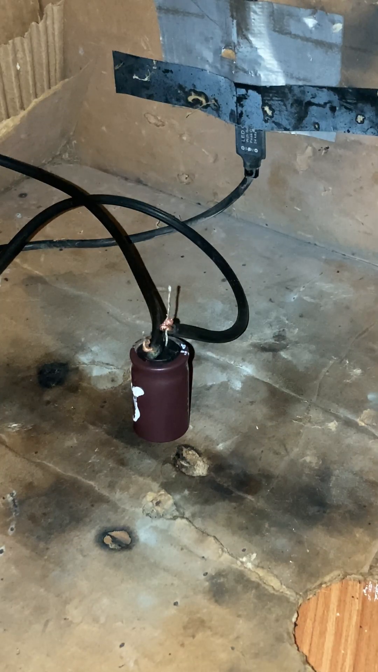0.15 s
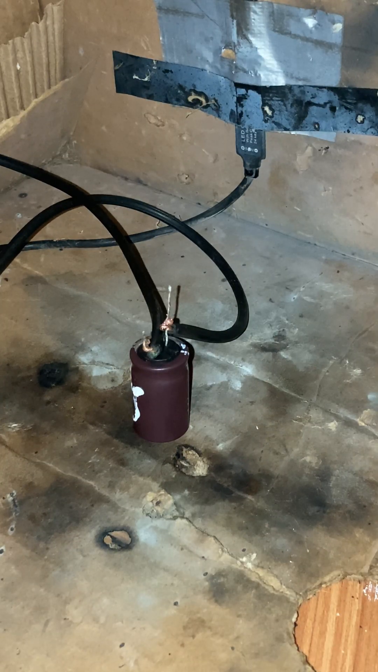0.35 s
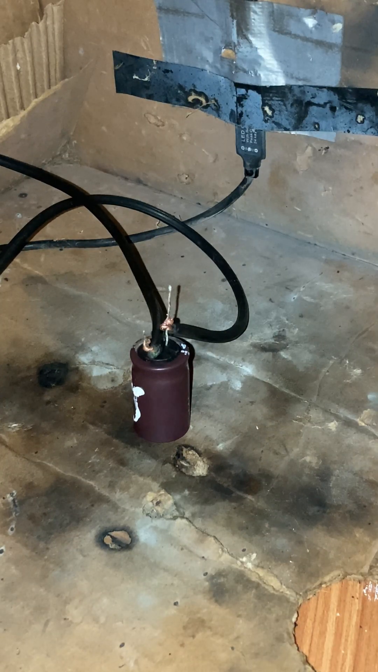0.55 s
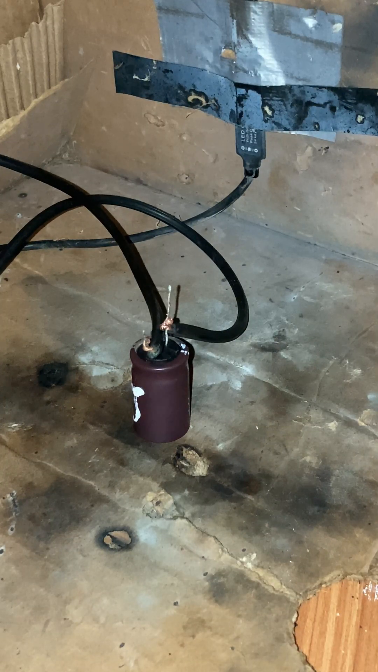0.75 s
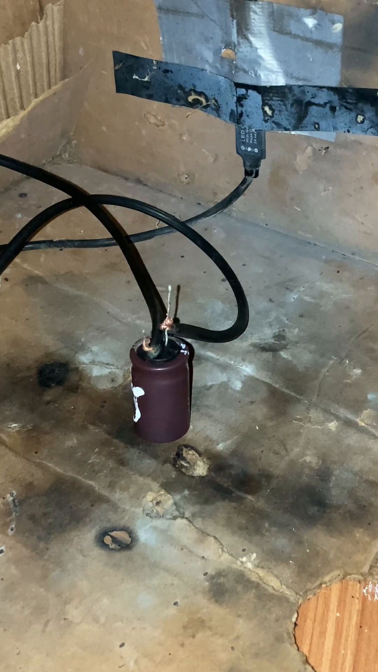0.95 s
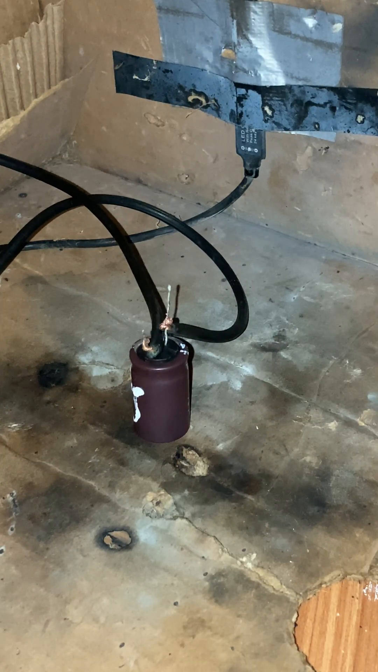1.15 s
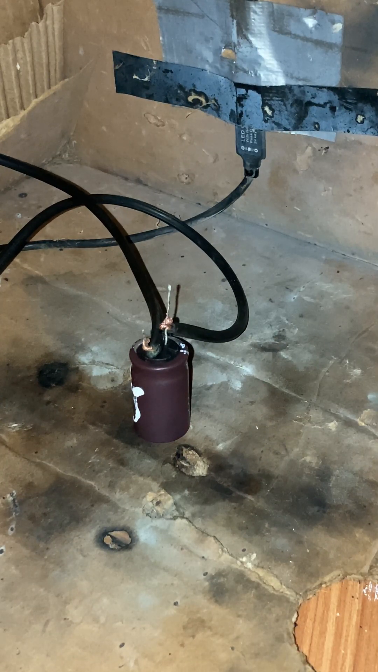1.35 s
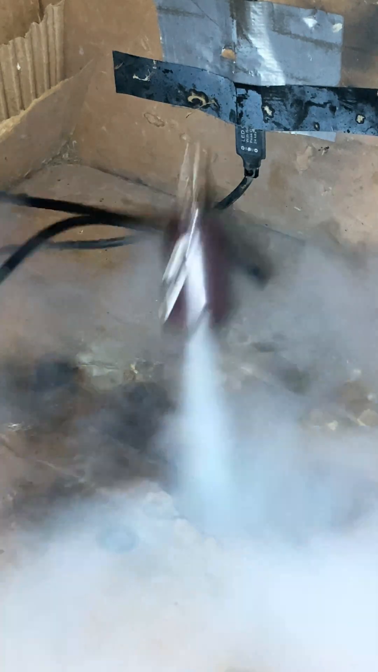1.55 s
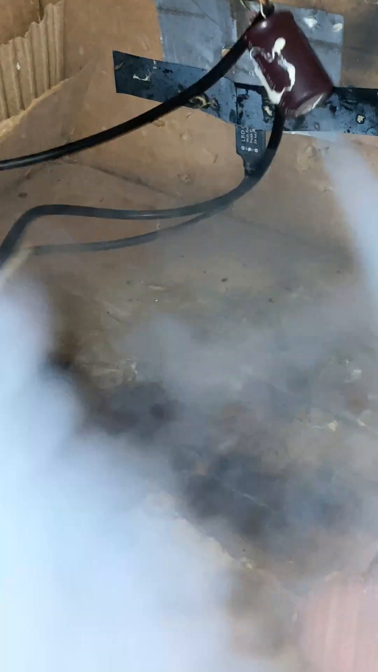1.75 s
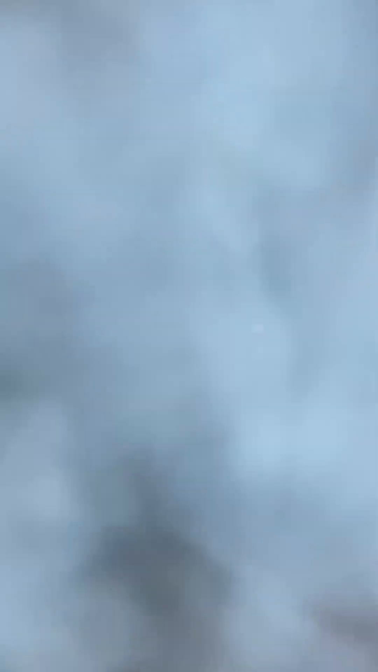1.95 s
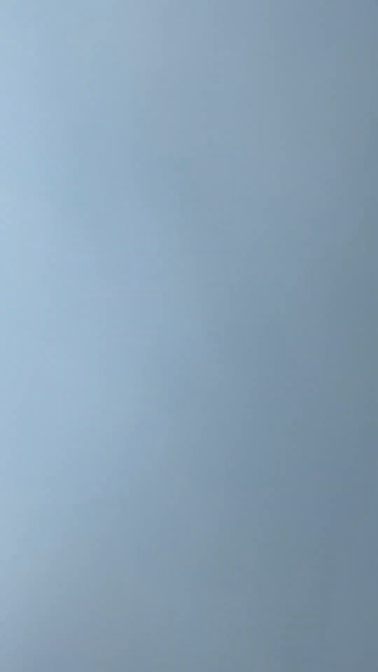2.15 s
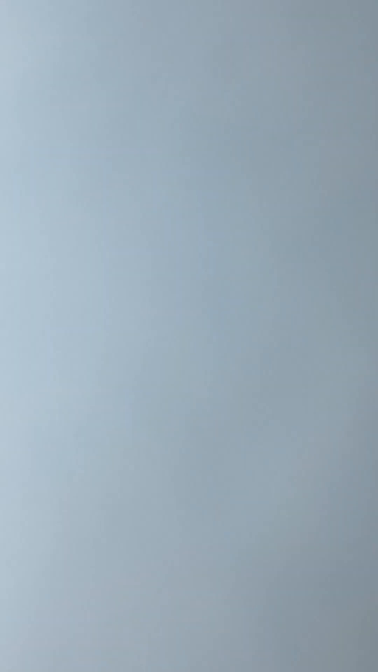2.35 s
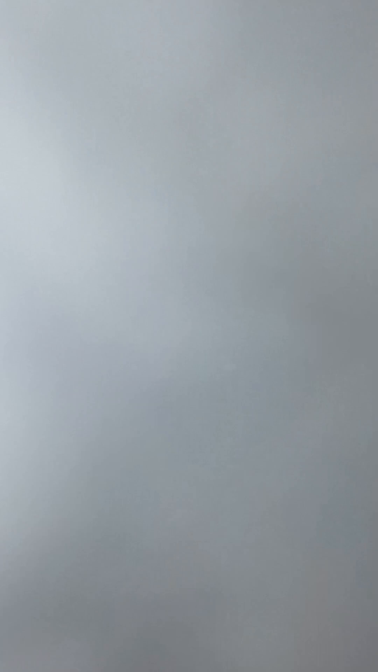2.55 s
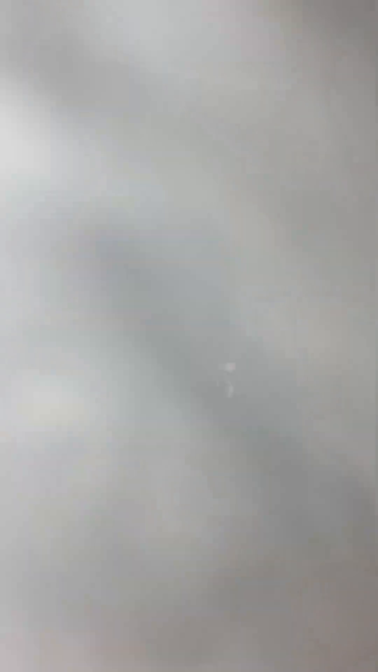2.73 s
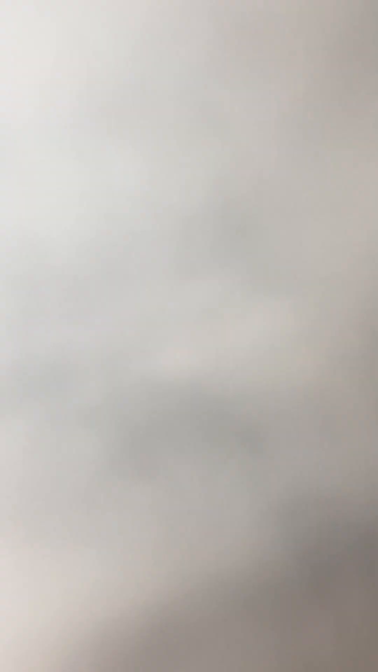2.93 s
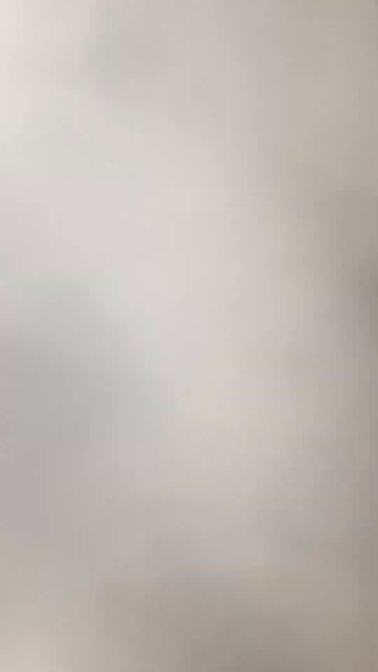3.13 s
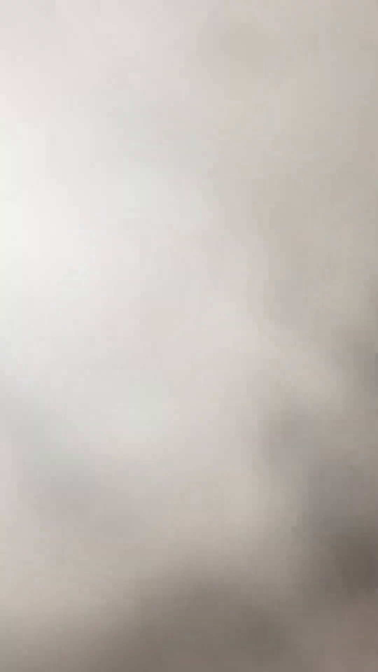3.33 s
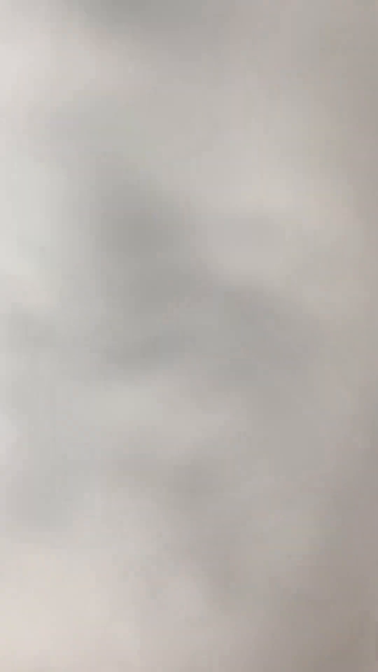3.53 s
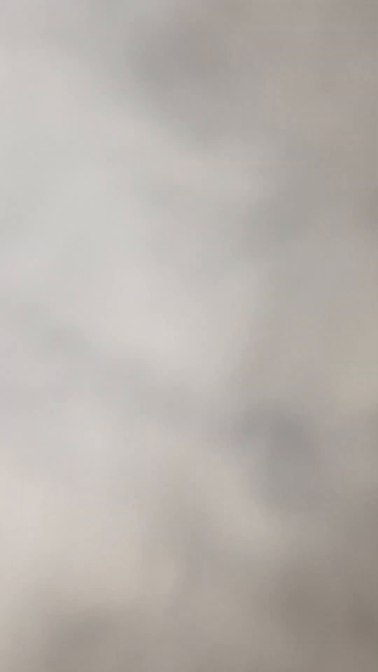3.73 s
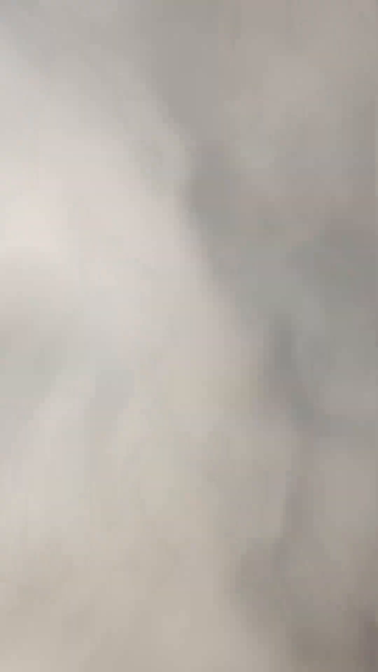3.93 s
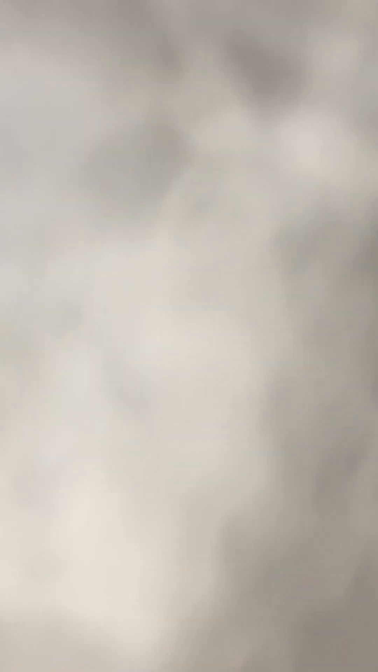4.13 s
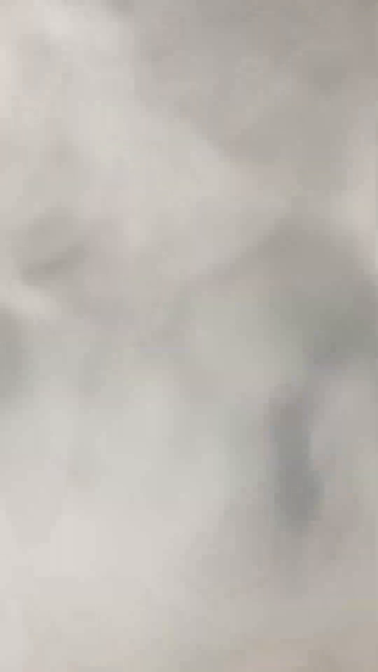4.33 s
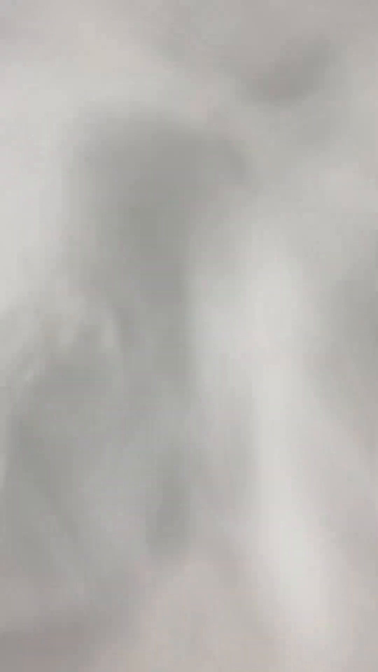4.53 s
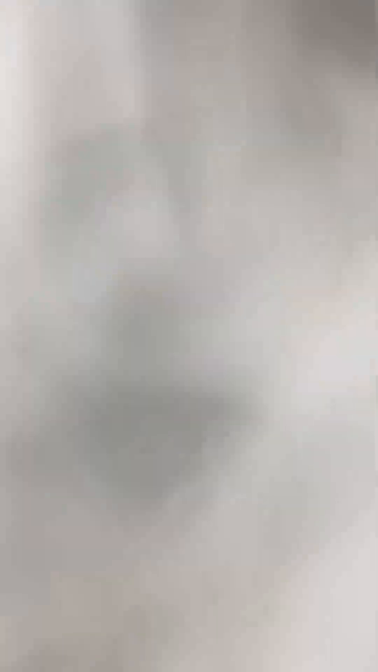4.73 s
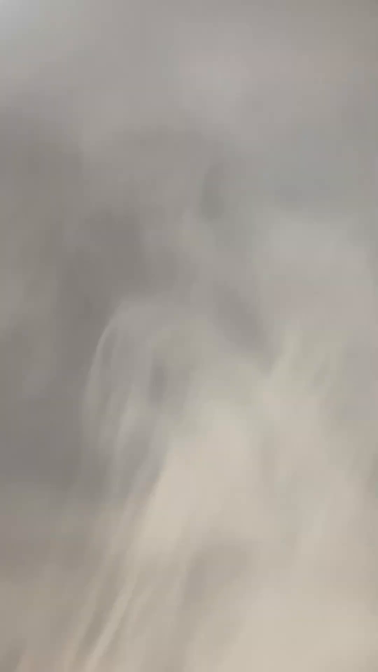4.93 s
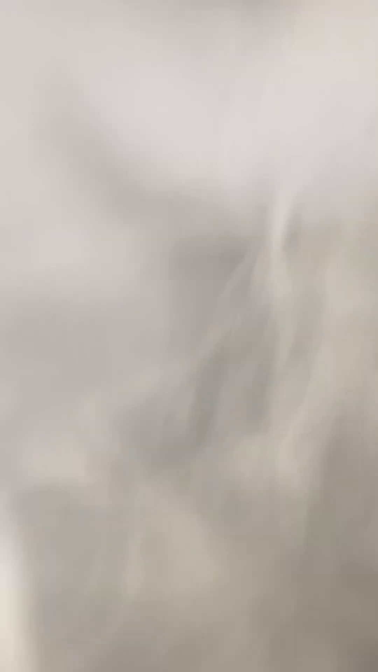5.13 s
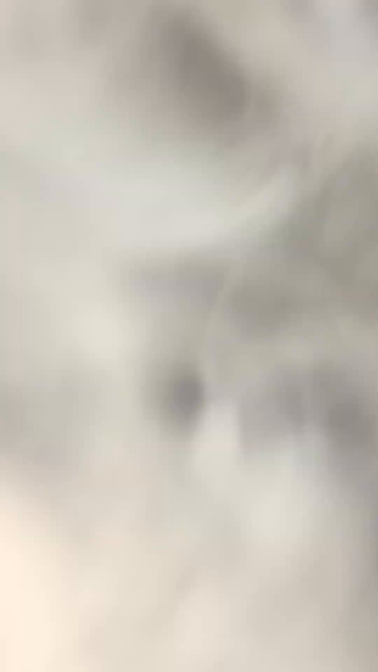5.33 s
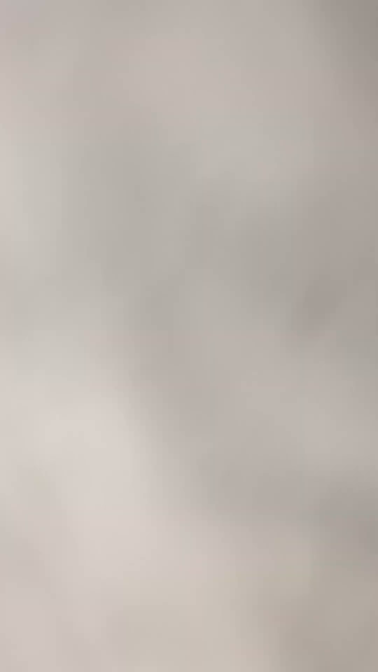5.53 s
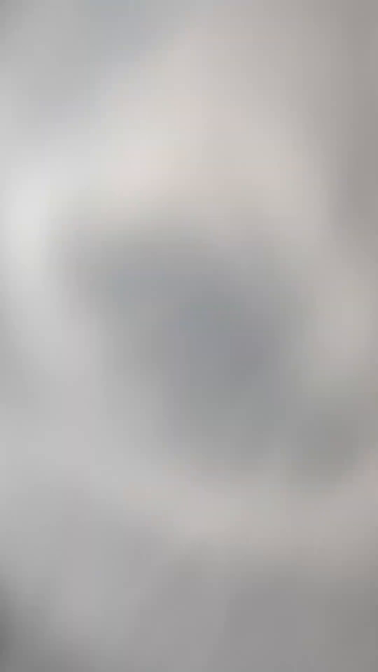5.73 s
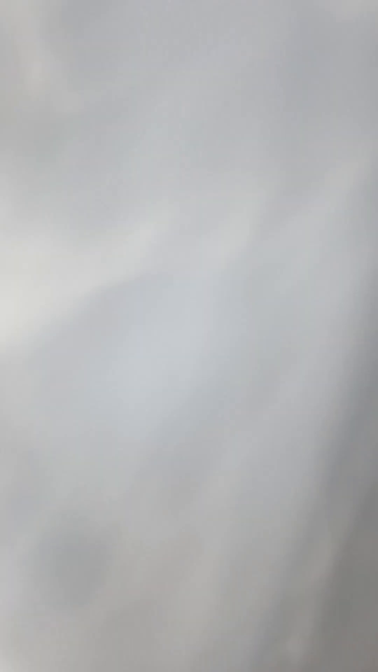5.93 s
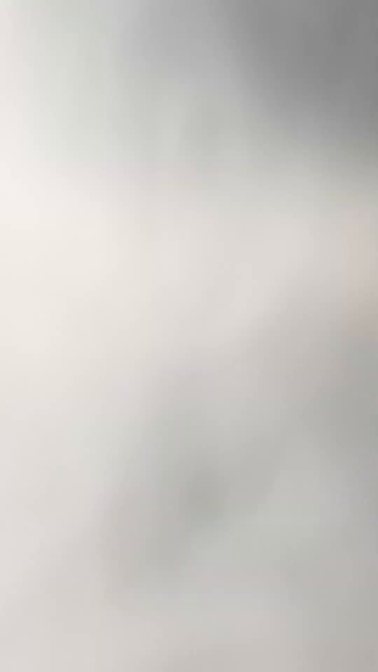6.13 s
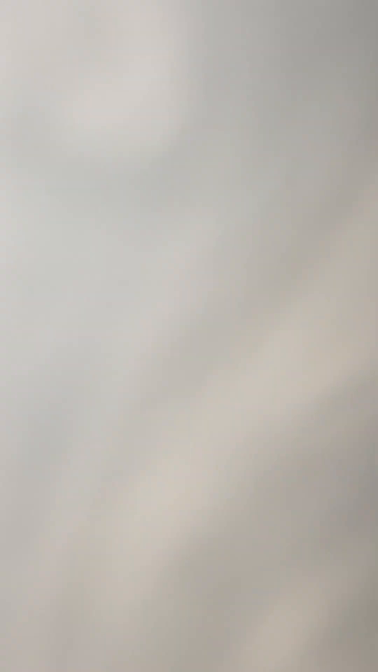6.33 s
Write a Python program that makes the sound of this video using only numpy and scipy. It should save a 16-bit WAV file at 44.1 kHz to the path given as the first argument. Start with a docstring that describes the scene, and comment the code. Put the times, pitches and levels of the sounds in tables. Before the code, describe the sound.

A capacitor bursts with a sharp crack, knocks against a wooden box and vents smoke in a spitting hiss over a droning fan.

```python
"""A workshop, a phone microphone listening from above. A fan drones throughout. A capacitor on mains
leaks a thin hiss that dies away. At 1.5 s its vent bursts with a crack, a thump and a brief high ring of
the can; the drone sinks. The can is flung against the wall of a wooden box: three knocks, the hardest with
a clack at 1.94 s. It blows smoke in a spitting hiss, strongest near 3 s, until it is empty, while the
drone slowly comes back."""
import sys
import numpy as np
from scipy import signal
from scipy.fft import rfft, irfft
from scipy.io import wavfile
from scipy.ndimage import uniform_filter1d, map_coordinates

SR = 44100
rng = np.random.default_rng(int(sys.argv[2]) if len(sys.argv) > 2 else 0)


def generate_wav(sig):
    """Save sig (samples, or channels by samples) to the path in sys.argv[1] as 16-bit PCM at SR."""
    pcm = np.round(np.clip(np.atleast_2d(sig).T, -1, 1) * 32767).astype(np.int16)
    wavfile.write(sys.argv[1], SR, pcm)


N = 285768
TIME_S, BIN_HZ = np.arange(N) / SR, np.fft.rfftfreq(N, 1 / SR)
BURST_S, FLYING_S, LANDS_S, SETTLED_S = 1.494, 1.53, 1.94, 2.19


def undb(db):
    return 10 ** (np.asarray(db) / 20)


def over_time(table):
    """Columns of a table over time, one value a sample."""
    time_s, *columns = np.transpose(table)
    return [np.interp(TIME_S, time_s, column) for column in columns]


def over_hz(table):
    """Columns of a table over log frequency, one value a bin."""
    hz, *columns = np.transpose(table)
    return [np.interp(np.log(np.maximum(BIN_HZ, 1)), np.log(hz), column) for column in columns]


def wander(per_s):
    """Random steps, smoothed twice; spread near 1."""
    hold = int(SR / per_s)
    steps = np.repeat(rng.standard_normal(N // hold + 1), hold)
    return 1.42 * uniform_filter1d(uniform_filter1d(steps, hold), hold)[:N]


def air_noise(spectrum, flicker_db, per_s):
    """Two unrelated noises of joint rms 1 in this colour; each half octave flickers alone."""
    colour_db, = over_hz(spectrum)
    bins = rfft(rng.standard_normal((2, N))) * undb(colour_db)
    octave = np.log2(BIN_HZ + 1)
    out = 0
    for centre in np.arange(np.log2(spectrum[0][0]), np.log2(spectrum[-1][0]) + .5, .5):
        band = np.cos(np.pi * np.clip(octave - centre, -.5, .5)) ** 2
        out = out + irfft(bins * band, N) * undb(flicker_db * wander(per_s))
    return out / np.sqrt(np.mean(out ** 2))


def swell(start_s, rise_s, t60_s):
    """Time since the start, and an envelope with top 1 that rises softly and dies away."""
    age = np.maximum(TIME_S - start_s, 0)
    envelope = (1 - np.exp(-age / rise_s)) ** 2 * 1000. ** (-age / t60_s)
    return age, envelope / envelope.max()


# Resonances of the fan's casing: pitch_hz, width_hz, level_db (against the fan's air)
CASING_MODES = [(523.6, 47, -11), (741.6, 4.6, -18), (923, 13, -22.5), (1285, 8.3, -26), (1529, 47, -26)]
def fan_casing():
    """Air rings in the steady resonances of the casing."""
    out = 0
    for hz, width_hz, db in CASING_MODES:
        ring = signal.lfilter(*signal.iirpeak(hz, hz / width_hz, fs=SR), rng.standard_normal((2, N)))
        out = out + undb(db) * ring / ring.std()
    return out


# Colour of the fan's air: frequency_hz, density_db
FAN_SPECTRUM = [(12, -68), (31, -50), (38, -13.5), (45, -19), (125, -5), (171, -9.5), (300, -25),
                (430, -20), (615, -22.5), (735, -19.5), (999, -33.5), (1500, -33.5), (1800, -46.5),
                (2440, -40.5), (4750, -51.5), (7530, -69), (9000, -87), (11700, -99), (19800, -120)]
# Blade tone: time_s, pitch_hz, level_db (against the fan's air)
BLADE_TONE = [(0, 134.2, -4), (.6, 137.3, 1), (1.5, 138.1, 1), (1.53, 138.4, -37), (2.1, 139, -10),
              (2.2, 136, 4), (2.7, 134, -2), (3.0, 137.4, -13), (3.5, 143, 1), (4.2, 143.7, 1),
              (4.4, 142.5, -6), (4.62, 142.7, 0.5), (5.5, 145.3, 3), (5.8, 145.1, 3), (5.95, 145.3, -4.5),
              (6.48, 146, 1)]
# The whole drone, sinking at the burst: time_s, level_db
FAN_LEVEL = [(0, -28), (1.2, -28), (1.5, -27.5), (1.53, -38), (1.85, -34.5), (2.16, -34), (3.0, -34.5),
             (4.4, -36), (5.2, -32.5), (6.48, -31)]
def fan():
    """The workshop's room tone: rumbling air, the casing, a wavering blade tone that creeps upward."""
    blade_hz, blade_db = over_time(BLADE_TONE)
    waver = 1 + .2 * (wander(per_s=6) + 1j * wander(per_s=6))
    blade = (waver * np.exp(2j * np.pi * np.cumsum(blade_hz) / SR)).real
    level_db, = over_time(FAN_LEVEL)
    buffet_db = .4 * wander(per_s=40)
    rumble = air_noise(FAN_SPECTRUM, flicker_db=.5, per_s=30)
    return undb(level_db + buffet_db) * (rumble + undb(blade_db) * blade + fan_casing())


# Modes of the wooden box: pitch_hz, level_db, t60_s, delay_s
BOX_MODES = [(150, -12, .05, .003), (236, -1, .045, .0031), (445, -9, .025, .0044), (650, 0, .03, 0),
             (950, -1, .025, 0), (1250, -3, .015, 0), (1550, -2, .015, 0), (1800, 0, .015, 0),
             (2400, -10, .01, 0)]
# The can striking the box: start_s, level_db, tick_db (added to the undelayed modes)
CAN_STRIKES = [(1.674, -29, -20), (1.940, -11, -16), (2.013, -25, -22)]
def box_knocks():
    """The can ticks on contact, then the panel answers with its low modes."""
    out = 0
    for start_s, strike_db, tick_db in CAN_STRIKES:
        for hz, mode_db, t60_s, delay_s in BOX_MODES:
            age, envelope = swell(start_s + delay_s, rise_s=.00084, t60_s=t60_s)
            db = strike_db + mode_db + (tick_db if delay_s == 0 else 0)
            out = out - undb(db) * envelope * np.sin(2 * np.pi * hz * age)
    return out


# Pressure wave of the burst: start_s, first_pitch_hz, last_pitch_hz, glide_s, rise_s
PRESSURE_WAVE = (1.49425, 760, 42, .0045, .0035)
def burst_thump():
    """The pressure wave in the box: its pitch drops fast, the lows come last."""
    start_s, first_hz, last_hz, glide_s, rise_s = PRESSURE_WAVE
    age, envelope = swell(start_s, rise_s, t60_s=.048)
    turns = last_hz * age + (first_hz - last_hz) * glide_s * (1 - np.exp(-age / glide_s))
    return undb(-9.5) * envelope * np.sin(2 * np.pi * turns)


# Short noises: start_s, level_db, centre_hz, width_hz, rise_s, t60_s
# Rows 3 to 8 are the burst, with the can ringing at 7500 and 10520 Hz; the row at 1.939 s is its clack.
SHORT_NOISES = [(0.298, -25.5, 7300, 6840, 0.014, 0.053), (.508, -31, 7414, 2500, .008, 0.055),
                (1.493, -6.5, 10800, 10100, 0.00051, 0.084), (1.494, -8.5, 1790, 2400, 0.00025, 0.019),
                (1.493, -10, 640, 395, 0.00078, 0.05), (1.495, -16, 7500, 1300, 0.00092, 0.28),
                (1.492, -11, 10520, 1010, 0.00062, 0.27), (1.495, -17, 3200, 4000, 0.0036, .3),
                (1.533, -15, 4400, 890, 0.0037, 0.049), (1.536, -16, 1920, 1050, 0.024, 0.073),
                (1.538, -19, 9200, 3200, 0.0065, 0.21), (1.919, -21, 9200, 4000, 0.0088, 0.15),
                (1.939, -22, 1000, 1400, .002, .07), (6.06, -46.5, 10940, 7987, 0.017, 0.37)]
def spurts_ring_and_clack():
    """Bands of noise: gas spurts, the vent cracks, the can rings briefly and then clacks on the box."""
    out, size = np.zeros((2, N)), int(.4 * SR)
    for start_s, db, hz, width_hz, rise_s, t60_s in SHORT_NOISES:
        edges_hz = np.clip([hz - width_hz / 2, hz + width_hz / 2], 300, .45 * SR)
        band = signal.butter(2, edges_hz, "band", fs=SR, output="sos")
        noise = signal.sosfilt(band, rng.standard_normal((2, size)))
        _, envelope = swell(start_s, rise_s, t60_s)
        span = slice(int(start_s * SR), int(start_s * SR) + size)
        out[:, span] += undb(db) * envelope[span] * noise / (3 * noise.std())
    return out


def with_wall_reflection(hiss):
    """A close wall mirrors the hiss; the image shifts as the can tumbles and fades once it lands."""
    detour_m = .12 + .03 * wander(per_s=40)  # extra path to the microphone
    sent_s = TIME_S - detour_m / 343
    share = .38 * np.interp(TIME_S, [BURST_S, FLYING_S, LANDS_S, SETTLED_S], [0, 1, 1, 0])
    image = np.array([map_coordinates(side, [sent_s * SR], mode="nearest") for side in hiss])
    return (hiss + share * image) / np.sqrt(1 + share ** 2)


# Colours of the jet's bright hiss and lower rush: frequency_hz, density_db
HISS_SPECTRUM = [(2940, -42), (5000, -19), (6500, -6), (7300, -1), (8200, 2), (9200, 2), (10000, 2.5),
                 (10900, -0.5), (12000, 4), (12900, 5), (13700, 1), (14600, 4), (15200, 2.5), (15700, 4.5),
                 (17500, 3)]
RUSH_SPECTRUM = [(250, -20), (600, -10), (1100, -7), (1500, -3.5), (2200, -6), (2900, -4), (3200, -6),
                 (3600, -1.5), (4000, -5), (4550, 2.5), (5200, -4), (6000, -2), (6800, -3), (8000, -30)]
# The leak before the burst: time_s, level_db
LEAK_LEVEL = [(0, -57), (.1, -48.5), (.22, -38.5), (.27, -39), (.31, -36.5), (.53, -37.5), (.61, -38.5),
              (.68, -46), (.82, -56), (1.1, -66), (1.49, -89)]
# Gas through the burst vent: time_s, level_db, rush_db (against the hiss)
VENT_FLOW = [(1.505, -24, -7), (1.53, -25, -6), (1.565, -25.5, -6), (1.61, -25.5, -10), (1.69, -28.5, -11),
             (1.84, -29, -11.5), (1.95, -28, -11), (2.1, -27.5, -11.5), (2.4, -28.5, -12), (2.7, -26, -13),
             (2.76, -23.5, -12), (2.85, -20, -12.5), (2.92, -18.5, -13), (3.02, -19, -14.5),
             (3.2, -20, -16), (3.3, -23.5, -16), (3.54, -28, -15), (4.2, -37.5, -14), (4.6, -48, -12),
             (5.2, -57, -12), (6.48, -63, -12)]
def gas_jet():
    """Below the microphone, turbulent gas leaves a small slit: hiss and rush flutter and spit."""
    leak_db, = over_time(LEAK_LEVEL)
    vent_db, vent_rush_db = over_time(VENT_FLOW)
    level_db = np.where(TIME_S < BURST_S, leak_db, vent_db)
    rush_db = np.where(TIME_S < BURST_S, -12.5, vent_rush_db)
    hiss = air_noise(HISS_SPECTRUM, flicker_db=.7, per_s=30)
    rush = undb(rush_db) * air_noise(RUSH_SPECTRUM, flicker_db=.8, per_s=19)
    flutter_db = .25 * wander(per_s=15) + .5 * wander(per_s=90)
    spit_db = 1.5 * wander(per_s=2100)  # droplets in the gas
    return with_wall_reflection((hiss + rush) * undb(level_db + flutter_db + spit_db))


def scene():
    """Capacitor, box and fan, twice over with unrelated noises, one for each microphone port."""
    return gas_jet() + spurts_ring_and_clack() + burst_thump() + box_knocks() + fan()


# The phone's two ports: frequency_hz, likeness (0 to 1), left_over_right_db, right_lead_rad
MICROPHONE_PORTS = [(60, .99, 2.9, .3), (200, .985, 3, .45), (270, .88, 3, .45), (345, .55, 2.5, 1),
                    (500, .93, 3, 1.6), (700, .93, 2.5, 2.1), (880, .88, 3.5, 1.9), (1100, .3, 3, 1.5),
                    (1400, .65, 1.5, 1.5), (2200, .6, 2, 1.7), (2940, .35, 2.5, 1.7), (5700, .3, .3, 0),
                    (7000, .97, -.2, 0), (16000, .97, 0, 0)]
def record(dry):
    """The phone overhead: its sides are alike in bass and treble, less so between; the top is cut."""
    likeness, balance_db, lead_rad = over_hz(MICROPHONE_PORTS)
    split_hz, in_step_hz, top_hz, treble_lead_s = 3000, 11380, 15680, 10 / SR
    lead_turns = np.where(BIN_HZ < split_hz, lead_rad / (2 * np.pi), (BIN_HZ - in_step_hz) * treble_lead_s)
    left, other = rfft(dry)
    right = likeness * left * np.exp(2j * np.pi * lead_turns) + np.sqrt(1 - likeness ** 2) * other
    tilt = undb(balance_db / 2)
    stereo = irfft(np.array([left * tilt, right / tilt]), N)
    return signal.sosfilt(signal.ellip(12, .2, 80, top_hz, fs=SR, output="sos"), stereo)


dry = scene()
out = record(dry)
generate_wav(out)
```